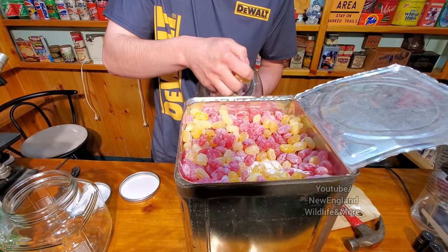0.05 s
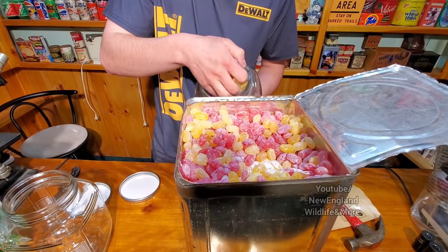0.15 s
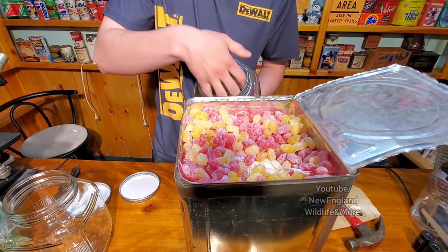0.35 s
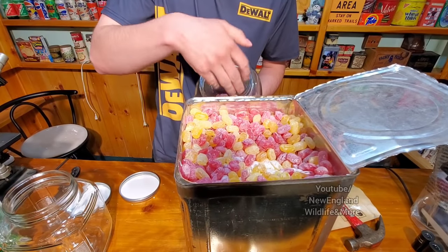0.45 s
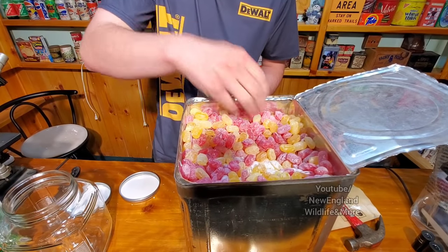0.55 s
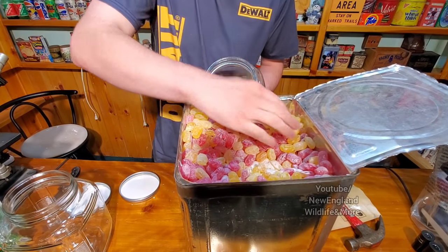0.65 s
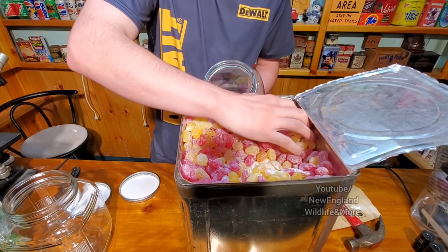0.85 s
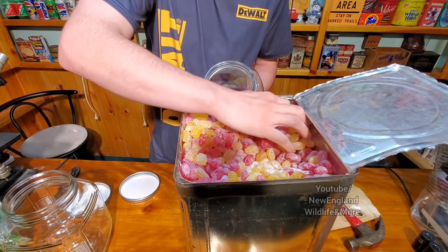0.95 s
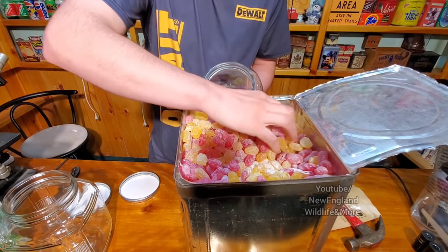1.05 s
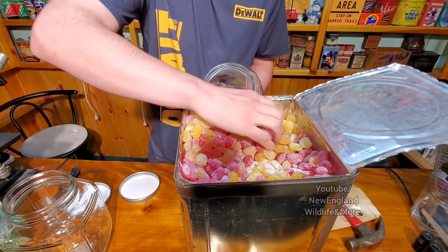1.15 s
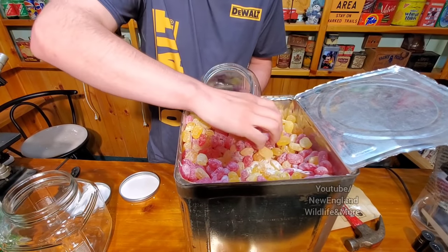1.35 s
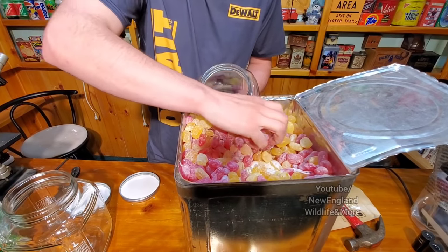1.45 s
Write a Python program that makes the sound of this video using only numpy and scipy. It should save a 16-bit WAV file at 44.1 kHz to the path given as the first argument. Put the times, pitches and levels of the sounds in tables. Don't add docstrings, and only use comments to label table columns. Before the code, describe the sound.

Hard candies drop into a glass jar: two light rim clinks, a dense ringing rattle, a few stragglers, then an abrupt cut to a hand rummaging in a candy-filled tin, dull knocks and sugary crunch, close in a small room.

```python
import sys
import numpy as np
from scipy import signal
from scipy.fft import rfft, irfft, next_fast_len
from scipy.io import wavfile

SR = 44100
rng = np.random.default_rng(int(sys.argv[2]) if len(sys.argv) > 2 else 0)


def level_to_linear(level):
    exponent = np.asarray(level, float) / 20
    return 10 ** exponent


def transcribe(u):
    v = np.clip(np.atleast_2d(u).T, -1, 1)
    q = np.round(v * 32767).astype(np.int16)
    wavfile.write(sys.argv[1], SR, q)


N = 66150

# frequency in Hz, level in dB per Hz.
SUGAR_COLOUR = [(1470, -17.5), (2500, -7), (3040, 0.5), (7420, -19.5), (9220, -12.5), (14800, -24.5),
                (16000, -14.5)]


def unit(x):
    return x / np.sqrt(np.mean(x ** 2) + 1e-20)


def along(points, hz):
    f, v = np.transpose(points)
    return np.interp(np.log(hz + 1), np.log(f + 1), v)


def curves(rows):
    s, *cols = np.transpose(rows)
    return [np.interp(np.arange(N) / SR, s, c) for c in cols]


def seconds(length):
    return np.arange(length) / SR


def filtered(x, response):
    m = next_fast_len(N + SR // 2)
    return irfft(rfft(x, m) * response(np.fft.rfftfreq(m, 1 / SR)), m)[..., :N]


def causal(spectrum):
    def response(hz):
        cep = irfft(np.log(level_to_linear(along(spectrum, hz)) + 1e-6))
        cep[1:len(cep) // 2] *= 2
        cep[len(cep) // 2 + 1:] = 0
        return np.exp(rfft(cep))
    return response


def pair(alike):
    a, b = rng.standard_normal((2, N))
    u = np.arccos(np.clip(alike, -1, 1)) / 2
    return np.array([np.cos(u) * a + np.sin(u) * b, np.cos(u) * a - np.sin(u) * b])


def clicks(share, size_db, spread_db):
    on = rng.random(N) < share
    size = np.minimum(rng.exponential(1, N), 3)
    side = rng.standard_normal(N) * [[.5], [-.5]]
    sign = np.sign(rng.standard_normal(N))
    return unit(on * sign * level_to_linear(size_db * size + np.clip(spread_db, 0, 5) * side))


def add(track, sound, s):
    part = track[..., round(s * SR):][..., :sound.shape[-1]]
    part += sound[..., :part.shape[-1]]


def ring(modes, fav_hz, wide_oct, rough, longest_s):
    rough_hz, blur_s = 55, .08
    t = seconds(SR // 3)
    hz, level_db, t60 = np.transpose(modes)[:, :, None]
    near = np.exp(-.5 * (np.log2(hz / fav_hz) / wide_oct) ** 2)
    luck_db = rng.standard_normal((len(modes), 1))

    knots = rng.standard_normal((2, 2, len(modes), int(rough_hz / 3) + 2))
    at = t * rough_hz
    low = at.astype(int)
    part = np.sin(np.pi / 2 * (at % 1)) ** 2
    wobble = knots[..., low] * (1 - part) + knots[..., low + 1] * part
    a, b = (rough * (1 - near) + np.minimum(t / blur_s, 2)) * wobble

    fade_s = np.clip(t60, .02, longest_s * np.minimum(1, 5000 / hz)) * (1 + near / 2)
    gain = level_to_linear(level_db + 11 * near + luck_db - 60 * t / fade_s)
    gain = gain / np.sqrt(1 + (t / blur_s) ** 2) * (1 - np.exp(-t / 0.00022))
    turn = 2 * np.pi * hz * t
    return (gain * ((1 + a) * np.sin(turn) + b * np.cos(turn))).sum(1)


def hush():
    # frequency in Hz, level in dB per Hz.
    colour = [(20, -40.5), (52, -7), (100, -28.5), (250, -26), (1000, -40), (2200, -37), (5000, -57),
              (16000, -52)]
    # time in seconds, gain in dB.
    gain_points = [(0, 11), (.04, 8), (.68, 7), (.76, -7), (.83, -3), (.84, -4)]
    noise = unit(filtered(pair(0.34), lambda hz: level_to_linear(along(colour, hz))))
    return level_to_linear(-69 + curves(gain_points)[0]) * noise


def room(x):
    # frequency in Hz, time to fall by 60 dB in seconds.
    fade_times = [(200, 0.55), (2000, 0.27), (5000, 0.16), (14000, 0.23)]
    hz, t, z = signal.stft(rng.standard_normal((2, SR // 2)), SR, nperseg=256)
    tail = signal.istft(z * level_to_linear(-60 * t / along(fade_times, hz)[:, None]), SR, nperseg=256)[1]
    late = np.pad(x.mean(0), (250, 0))[None]
    return signal.fftconvolve(late, tail / np.linalg.norm(tail[0]), axes=1)[:, :N]


def jar_air():
    # start in seconds, peak level in dB.
    booms = [
        (0.043, -61),
        (0.126, -53.5),
        (0.216, -39),
        (0.244, -49.5),
        (0.316, -37.5),
        (0.338, -37.5),
        (0.418, -40.5),
        (0.574, -59.5),
    ]
    # time in seconds, pitch in Hz.
    air_pitch = [(0, 243), (.53, 240.7), (.7, 332)]
    # frequency in Hz, level in dB per Hz.
    thump_colour = [(30, -37.5), (55, -2), (130, -16.5), (300, -4), (1100, -9), (1600, -19.5), (16000, -94)]
    swell, shake, t = np.zeros(N), np.zeros(N), seconds(SR // 2)
    for s, db in booms:
        add(swell, level_to_linear(db + 3.0 - 60 * t / 0.17) * (1 - np.exp(-t / 0.0052)), s)
        add(shake, level_to_linear(2 * (db - 60 * t / 0.47)), s)
    boom = swell * np.sin(2 * np.pi * np.cumsum(curves(air_pitch)[0]) / SR)
    thump = unit(filtered(pair(0.79) + clicks(0.011, size_db=3.5, spread_db=2.0), causal(thump_colour)))
    return boom * level_to_linear([[.6], [-.6]]) + level_to_linear(-6) * np.sqrt(shake) * thump


def rim_clinks():
    # start in seconds, peak level in dB, sugar snap in dB, favoured pitch in Hz.
    clinks = [
        (.043, -30, -37, 4430),
        (.127, -32.5, 1, 4236),
    ]
    # pitch in Hz, level in dB, time to fall by 60 dB in seconds.
    rim_modes = [(1100, -2, 0.081), (1530, -17.5, .06), (1980, -11.5, 0.1), (2465, -22.5, .1),
                 (3670, -8, 0.054), (3560, -8.5, 0.069), (3820, 6, 0.079), (4236, -16.5, .12),
                 (4430, -10.5, 0.13), (4930, -14, 0.11), (5800, -9, 0.16), (9300, -11.5, 0.11),
                 (8850, -23.5, 0.083)]
    # frequency in Hz, level in dB per Hz.
    tick_colour = [(300, -51), (1100, 1), (3800, 4), (6500, 1), (7500, -47), (9000, -20.5), (16000, -21)]
    out, t = np.zeros((2, N)), seconds(SR // 3)
    for s, db, snap_db, fav_hz in clinks:
        tick = level_to_linear(-60 * t / 0.18) * unit(filtered(pair(0.59), causal(tick_colour)))[:, :len(t)]
        snap = level_to_linear(snap_db - 60 * t / 0.11) * np.diff(pair(0.21))[:, :len(t)]
        glass = ring(rim_modes, fav_hz, wide_oct=.05, rough=.45, longest_s=.16)
        add(out, level_to_linear(db - 9.5) * (glass + tick + snap) * level_to_linear([[1], [-1]]), s)
    return out


def handful():
    # start in seconds, peak level in dB, wall ring over clatter in dB, favoured pitch in Hz.
    drops = [(.0014, -66, -20, 2150), (0.209, -26, -7.5, 4140), (.222, -18.5, -8.5, 2470),
             (0.2441, -21, 6, 3815), (0.2529, -16, 3.5, 3815), (.2555, -16, -3, 2763),
             (0.2906, -19, 5.5, 3860), (.2925, -22.5, 5.5, 5350), (0.3166, -18.5, -0.5, 8700),
             (0.33, -17, -5, 2130), (0.3373, -25.5, 10, 5400), (0.3553, -11, -4, 5350),
             (.3575, -18, 6, 11400), (0.362, -13.5, -10, 4137), (0.375, -44, -10, 3287),
             (0.3922, -5.5, 1.5, 2153), (.398, -11, -1, 3287), (0.4036, -10, 4, 1946),
             (0.4156, -21.5, 5.5, 2763), (0.4365, -18.5, -1, 2150), (0.4409, -4, 0, 3815),
             (0.4464, -9.5, 1.5, 3287), (0.45, -15, 0.5, 2471), (.4565, -25, 0.5, 4848),
             (0.4616, -17, 6, 2763), (.467, -37, -8.5, 6250), (.541, -30, -12.5, 3463),
             (.596, -36.5, -11, 4137), (0.6154, -25.5, -6, 2470), (0.651, -16.5, -7, 2153),
             (.653, -36.5, 10.5, 6250), (0.7005, -29.5, -5, 2153)]
    wall_hz = [1946, 2153, 2471, 2763, 3287, 3463, 3815, 4137, 4848, 5350, 6250, 11400, 8700, 6755]
    # level in dB, time to fall by 60 dB in seconds.
    wall_levels = [(-5.5, 0.051), (-9.5, 0.13), (-6.5, 0.087), (-5.5, 0.22), (-4.5, 0.077), (4, 0.1),
                   (-3, 0.074), (-2.5, 0.092), (-4, 0.14), (-4, 0.023), (-1, 0.028), (-12, 0.028),
                   (-8, 0.1), (-11.5, 0.054)]
    # frequency in Hz, level in dB per Hz.
    clatter_colour = [(530, -55.5), (900, -25.5), (2420, 6.5), (3000, -11), (3730, -4), (5610, -10),
                      (16000, -32.5)]
    wall, shake, sharp = np.zeros((2, N)), np.zeros(N), np.zeros((2, N))
    t = seconds(SR // 3)
    modes = np.column_stack([wall_hz, wall_levels])
    rise = 1 - np.exp(-t / 0.0015)
    for s, db, ring_db, spot_hz in drops:
        fav_hz = min(wall_hz, key=lambda hz: abs(hz - spot_hz))
        longest_s = max(.2 - .33 * s, .055)
        glass = ring(modes, fav_hz, wide_oct=.025, rough=.45, longest_s=longest_s)
        add(wall, level_to_linear(db + ring_db - 19) * glass, s)
        add(shake, level_to_linear(2 * (db - 60 * t / 0.12)) * rise ** 2, s)
        fade = level_to_linear(db - 60 * t / 0.07) * rise + level_to_linear(db + 2 - 60 * t / 0.0094)
        band = signal.butter(2, [fav_hz * 0.84, fav_hz * 1.385], "bp", fs=SR, output="sos")
        add(sharp, signal.sosfilt(band, fade * pair(0.29)[:, :len(t)]), s)
    contacts = 1.07 * pair(0.087) + clicks(0.054, size_db=-2.5, spread_db=9)
    grit = unit(filtered(contacts, causal(clatter_colour)))
    top = filtered(grit, lambda hz: (1j * hz / (4700 + 1j * hz)) ** 2)
    clatter = np.sqrt(shake) * (grit - top) + level_to_linear(8.5) * shake ** 0.58 * top
    return (wall + level_to_linear(-13.5) * clatter + level_to_linear(-5) * sharp) * level_to_linear([[1.75], [-1.75]])


def counter_thud():
    # time in seconds, level in dB.
    press = [(.83, -30.5), (.87, -41.5), (.9, -49), (.95, -71), (1, -44), (1.11, -34.5), (1.22, -54),
             (1.28, -42.5), (1.37, -47.5), (1.45, -41)]
    # frequency in Hz, level in dB per Hz.
    thud_colour = [(30, -23), (58, -5.5), (100, -10.5), (155, -3.5), (200, -10.5), (300, -52.5)]
    thud = unit(filtered(pair(0.85), lambda hz: level_to_linear(along(thud_colour, hz))))
    return level_to_linear(curves(press)[0] - 7.0) * thud


def tin_floor():
    # time in seconds, level in dB, pitch in Hz.
    flex = [(.835, -61.5, 159.8), (.845, -38.5, 158.8), (.864, -44.5, 154.3), (.902, -70, 158.6),
            (.958, -73, 170.6), (1.016, -57, 160), (1.085, -41.5, 154.8), (1.118, -38, 155),
            (1.152, -52.5, 160), (1.182, -40, 151), (1.205, -56, 164.6), (1.284, -43.5, 172),
            (1.33, -65, 161.6), (1.36, -48, 178.8), (1.394, -60, 161.5), (1.456, -47.5, 151),
            (1.5, -50, 167.6)]
    db, hz = curves(flex)
    return level_to_linear(db + 2.0) * np.sin(2 * np.pi * np.cumsum(hz) / SR)


def rolling_heap(bumps):
    # time in seconds, level in dB.
    dig = [(.83, -50.5), (.87, -48.5), (.9, -37.5), (.94, -57.5), (.985, -35.5), (1.02, -48), (1.06, -37),
           (1.12, -28), (1.155, -37.5), (1.2, -34.5), (1.27, -37), (1.33, -46.5), (1.39, -45), (1.425, -36),
           (1.46, -40), (1.5, -40)]
    # frequency in Hz, level in dB per Hz.
    heap_colour = [(150, -43), (250, -2), (383, -3.5), (1020, -4.5), (6000, -23), (7800, -37),
                   (13200, -120)]
    # pitch in Hz, width in Hz, level in dB.
    panel_modes = [(160, 26, -33), (510, 22.5, 6), (880, 46, -2.5), (1613, 63, 2), (1963, 210, -2.5)]

    def panels(f):
        total = 0
        for k, (c, w, db) in enumerate(panel_modes):
            total = total + (-1) ** k * level_to_linear(db) * 1j * f * w / (c * c - f * f + 1j * f * w)
        return total
    roll = unit(filtered(bumps + 0.9 * pair(0.27), causal(heap_colour)))
    roll = roll + level_to_linear(-3.0) * unit(filtered(bumps, panels))
    return level_to_linear(curves(dig)[0] - 2.0) * roll


def grinding_sugar(bumps):
    # time in seconds, level in dB.
    slide = [(0.835, -84), (0.839, -80), (0.881, -58), (0.943, -65.5), (1.117, -46.5), (1.261, -50.5),
             (1.333, -66.5), (1.431, -57), (1.5, -62)]
    grains = 0.71 * bumps + clicks(0.15, size_db=14.0, spread_db=21) + 1.9 * pair(0.11)
    return level_to_linear(curves(slide)[0] + 5.5) * unit(filtered(grains, causal(SUGAR_COLOUR)))


def snapping_crusts():
    # start in seconds, peak level in dB.
    snaps = [(0.8624, -52.5), (0.8754, -41.5), (0.9018, -43), (0.9672, -56), (0.9832, -38.5), (1.0204, -46),
             (1.038, -49), (1.0625, -30.5), (1.1274, -34), (1.1404, -33.5), (1.1653, -24.5),
             (1.1944, -29.5), (1.2644, -37), (1.3538, -54.5), (1.3664, -50), (1.4137, -33), (1.4227, -47.5),
             (1.4594, -53)]
    out, t = np.zeros((2, N)), seconds(SR // 20)
    crust = unit(filtered(pair(0.58), causal(SUGAR_COLOUR)))
    for s, db in snaps:
        piece = crust[:, round(s * SR / 2):][:, :len(t)]
        add(out, level_to_linear(db - 5 - 60 * t / 0.0087) * piece, s)
    return out


def candy_knocks():
    # start in seconds, peak level in dB, pitch in Hz.
    knocks = [(0.833, -32, 405), (0.862, -29, 462), (0.9, -33.5, 958), (0.944, -34, 488),
              (0.969, -29.5, 807), (0.982, -25, 934), (1.036, -30, 1047), (1.054, -29, 944),
              (1.071, -32, 940), (1.08, -30.5, 510), (1.087, -24.5, 918), (1.102, -20, 1001),
              (1.124, -21.5, 768), (1.139, -17, 1016), (1.176, -25.5, 535), (1.193, -30.5, 610),
              (1.234, -23, 500), (1.244, -23.5, 1023), (1.285, -28, 885), (1.3535, -26.5, 736),
              (1.378, -36, 1580), (1.407, -29.5, 1615), (1.4221, -21, 1068), (1.46, -27.5, 498)]
    out, t = np.zeros((2, N)), seconds(SR // 20)
    for s, db, hz in knocks:
        knock = np.sin(2 * np.pi * hz * t) * level_to_linear(-60 * t * hz / 22)
        knock = knock + 0.29 * np.sin(2 * np.pi * 2.184 * hz * t) * level_to_linear(-60 * t / 0.058)
        puff = signal.lfilter([.5], [1, -1.2, .36], pair(0.14)[:, :len(t)])
        add(out, level_to_linear(db - 5.5) * (knock + hz / 2500 * level_to_linear(-60 * t / 0.033) * puff), s)
    return out


def tin():
    bumps = clicks(.025, size_db=5.5, spread_db=6)
    out = rolling_heap(bumps) + grinding_sugar(bumps) + counter_thud() + tin_floor()
    out = out + candy_knocks() + snapping_crusts()
    lag_s = .0001 * np.array([[1], [0]])
    out = filtered(out, lambda hz: np.exp(-2j * np.pi * hz * lag_s))
    start = np.clip((np.arange(N) / SR - .8305) / 0.0025, 0, 1) ** 2
    return out * start * level_to_linear([[.9], [-.9]])


def scene():
    jar = rim_clinks() + handful() + jar_air()
    heap = tin()
    return jar + level_to_linear(-6.0) * room(jar) + heap + level_to_linear(-8.5) * room(heap) + hush()


def top_cut(x):
    return signal.sosfilt(signal.butter(12, 16300, fs=SR, output="sos"), x)


def record(dry):
    # frequency in Hz, gain of the left-right difference in dB.
    spread = [(50, -17.5), (250, -12), (1000, -1.5), (5000, 1.5), (14000, 2)]
    mid = dry.mean(0)
    side = (dry[0] - dry[1] - 0.051 * dry.sum(0)) / 2
    side = filtered(side, lambda hz: level_to_linear(along(spread, hz)))
    heard = np.array([mid * 1.106 + side, mid * 0.93 - side])
    heard = filtered(heard, lambda hz: (hz < 15900) * (1j * hz / (45 + 1j * hz)) ** 2)
    return top_cut(heard)


dry = scene()
out = record(dry)
transcribe(out)
```